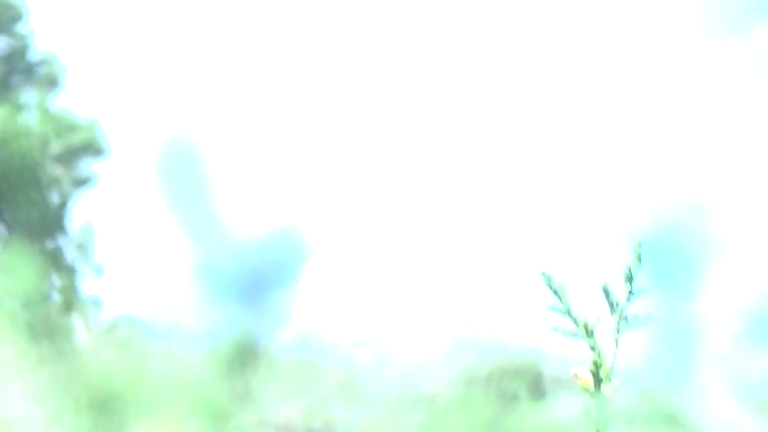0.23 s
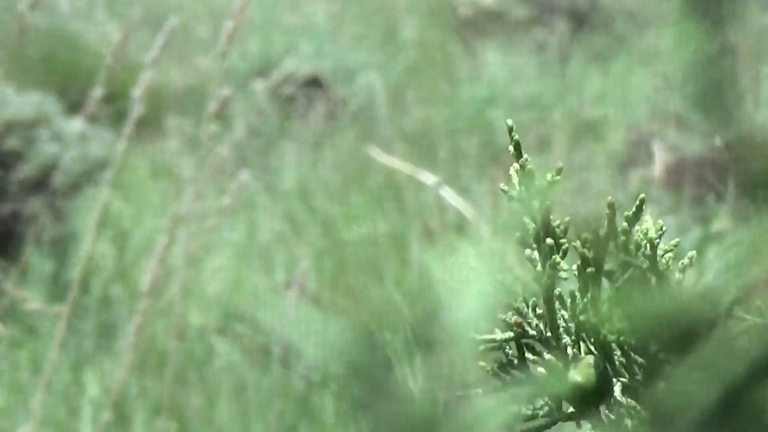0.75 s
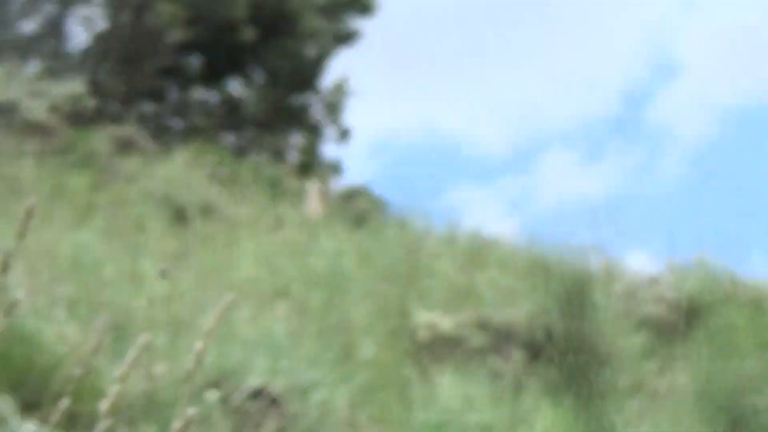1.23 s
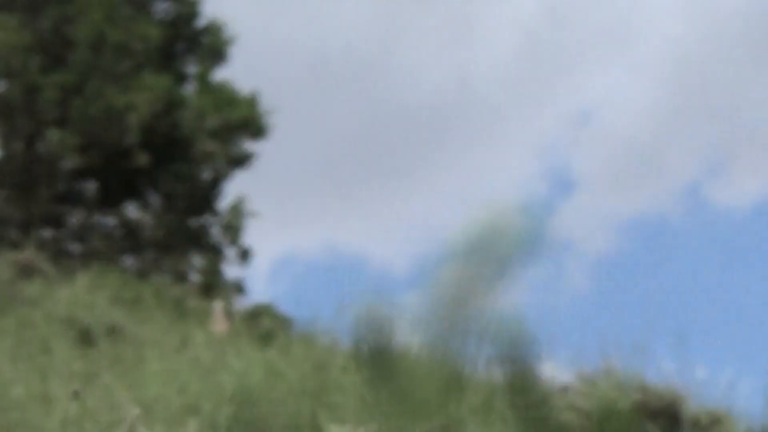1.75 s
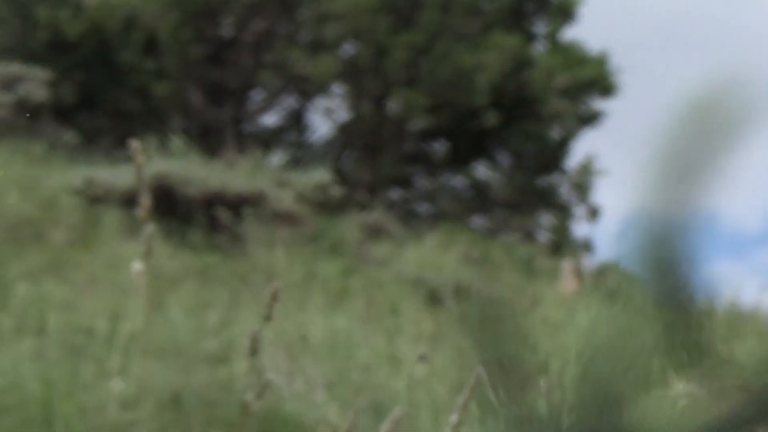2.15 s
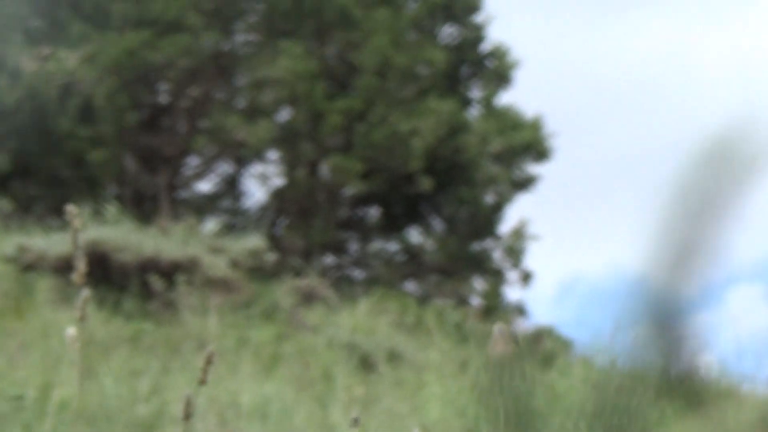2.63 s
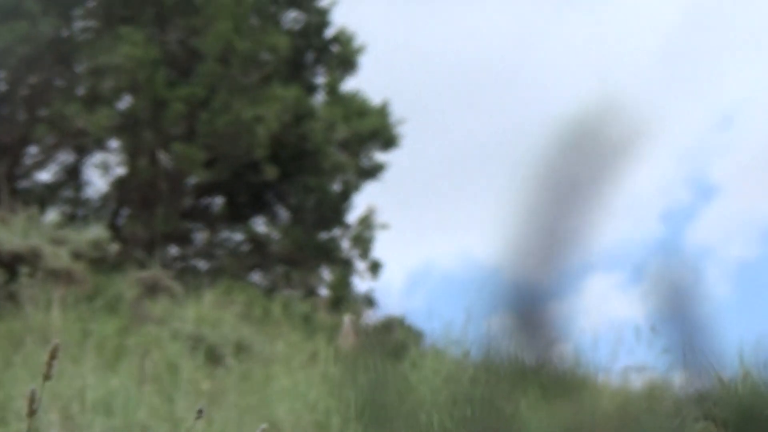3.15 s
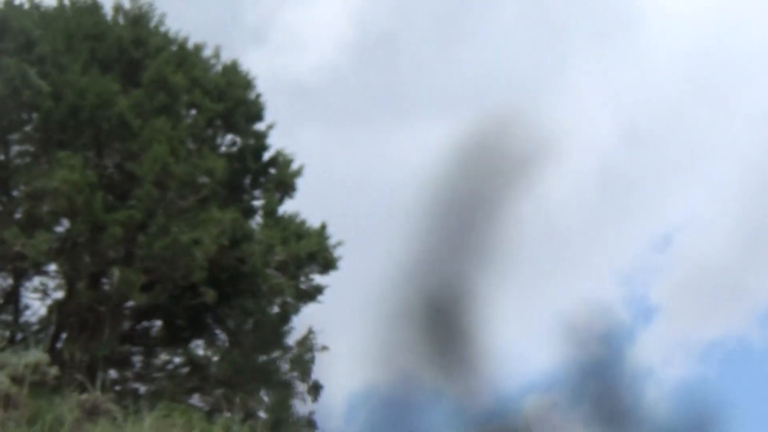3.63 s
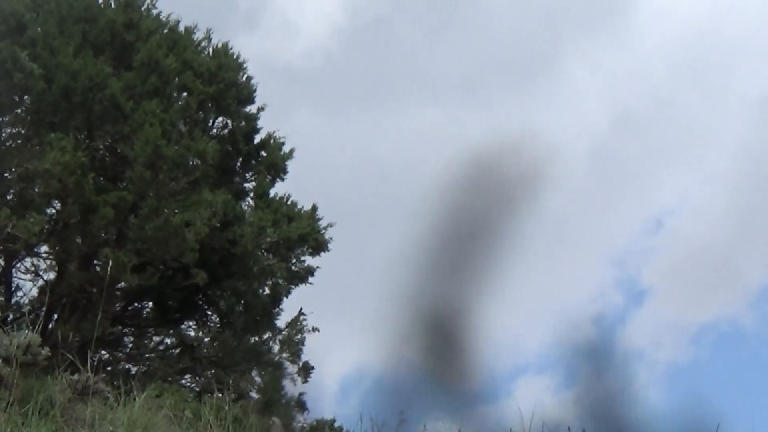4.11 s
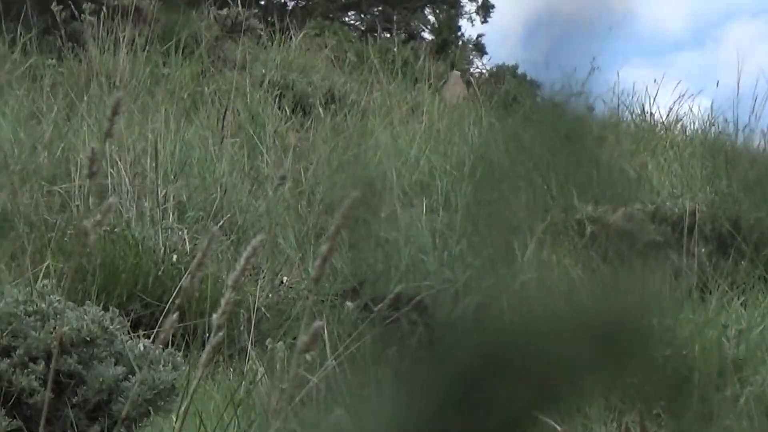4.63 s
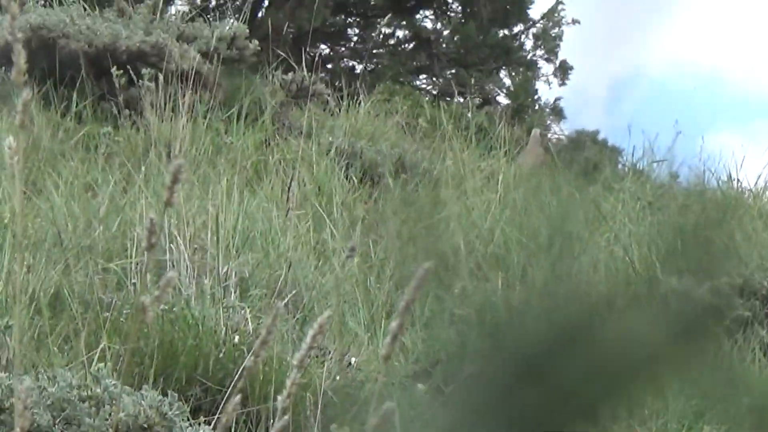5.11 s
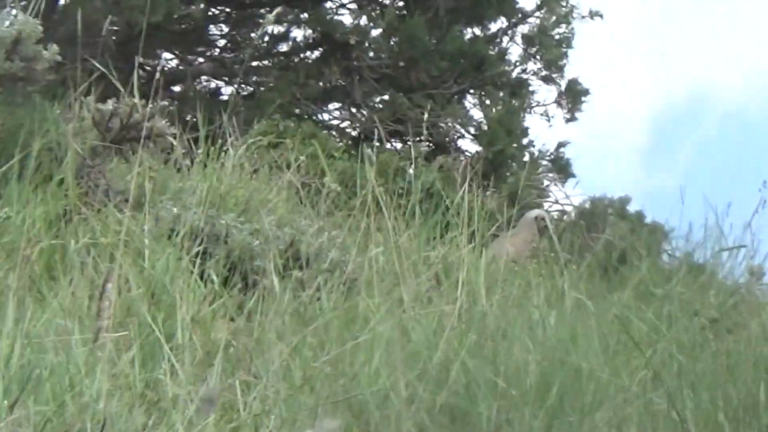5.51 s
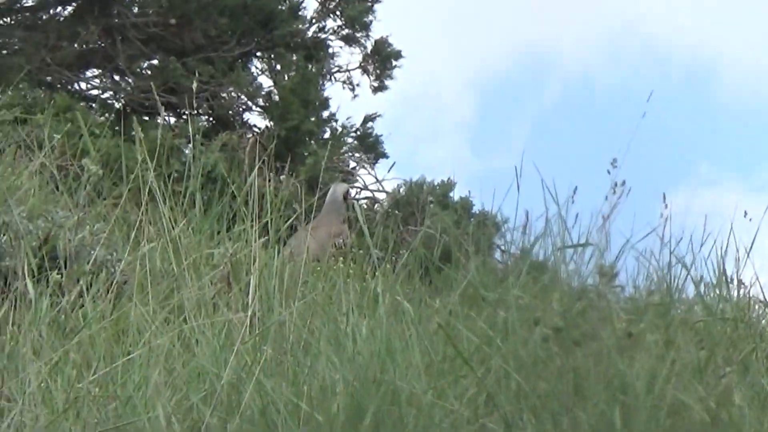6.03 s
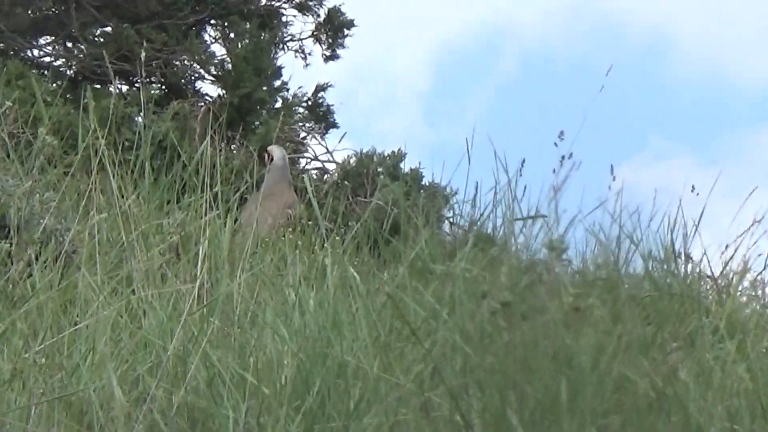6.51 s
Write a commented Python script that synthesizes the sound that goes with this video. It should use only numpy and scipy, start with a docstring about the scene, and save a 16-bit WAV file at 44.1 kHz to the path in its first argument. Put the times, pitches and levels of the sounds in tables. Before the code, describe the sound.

Outdoors on an open grassy slope, with branches touching the microphone. From 0 to 2 s, loud dry foliage scrapes and crackles very close, bright and needly at first, swelling around 0.35 s, then patchier, with sharp twig snaps throughout. Dull body bumps come near 0.5, 0.8, 1.2 and 1.4 s, the heaviest around 1.35 s, and a last cluster near 1.9 s. After 2.3 s only soft grass stirring and tiny ticks remain over a faint breeze. A partridge upslope gives hoarse, strained squeals in short bursts from 2.5 to 4.1 s. From 4.3 s it changes to low, throaty, rough clucks, at first spaced, then quicker and often paired, the strongest near 6.75 s. From about 4.6 s a distant songbird twitters thinly with high hooks, slurs, trills and whistles. A few closer snaps return at 5.4 to 5.7 s.

```python
"""Branches at the camera, partridge upslope

A grassy hillside. Juniper twigs and grass brush and snap against a camera being moved into place, right at
the microphone: friction is crackling noise, snaps and bumps are short bursts ringing through wood and body.
Upslope a partridge squeals, then clucks at length: rough harmonic notes shaped by a throat.
Farther off a small songbird twitters in thin gliding tones, over a faint breeze of coloured noise."""
import sys
import numpy as np
from scipy import signal
from scipy.fft import rfft, irfft, next_fast_len
from scipy.io import wavfile
from scipy.ndimage import uniform_filter1d, map_coordinates

SR = 44100
rng = np.random.default_rng(int(sys.argv[2]) if len(sys.argv) > 2 else 0)


def wrap_up_sound(samples):
    """Save the sound to the file named by the first command line argument, as 16-bit audio."""
    columns = np.atleast_2d(samples).T
    # keep every value between -1 and 1, then stretch to whole-number steps
    tamed = np.clip(columns, -1, 1)
    steps = np.round(tamed * 32767).astype(np.int16)
    wavfile.write(sys.argv[1], SR, steps)


N = 298557

# Foliage pressing on the camera body. Each row: time in seconds, scraping level in dB.
BRUSH_LEVEL = [(0, -38.5), (0.26, -33), (0.305, -30.5), (0.35, -25.5), (0.42, -29.5), (0.51, -30.5),
               (0.56, -40.5), (0.66, -40), (0.9, -40), (0.95, -53), (1.14, -39), (1.24, -36), (1.31, -49.5),
               (1.42, -37.5), (1.72, -44.5), (1.79, -48), (1.89, -41), (2.0, -57), (2.1, -46.5),
               (2.35, -53)]
# Contact passing from needle tips to the branch itself. Each row: time in seconds, then needle crackle,
# rubbing and handling rumble, each in dB over the scraping.
CONTACT_BALANCE = [(0, 8.5, -11, -19), (0.25, 4, -19, -16), (0.34, -9, -28.5, -18.5),
                   (0.45, -0.5, -21, -22), (0.66, -4, -3, -6.5), (0.88, -3, -3, -12), (1.24, -4.5, -7, -20),
                   (1.42, -6, -15, -16), (1.65, -4, -13.5, -23), (2.3, -10, -6.5, -16)]
# Grass stirring afterwards. Each row: time in seconds, level in dB.
STIR_LEVEL = [(2.3, -50), (2.42, -61), (2.51, -51), (2.83, -59), (2.92, -51), (3.3, -55.5), (3.59, -52.5),
              (3.75, -58), (4.5, -60), (5.37, -61.5), (5.74, -55), (5.88, -60.5), (6.23, -65),
              (6.66, -58.5), (6.77, -69)]
# Handling rumble spectrum. Each row: frequency in Hz, level in dB.
RUMBLE_SPECTRUM = [(12, -42), (20, -23), (54, 0.5), (145, -6.5), (170, -8.5), (220, -19), (370, -120)]
# Dull rubbing spectrum. Each row: frequency in Hz, level in dB.
RUB_SPECTRUM = [(76, -42), (130, -9.5), (210, -4.5), (301, -2.5), (387, -4.5), (492, -2.5), (700, -13.5),
                (910, -26.5), (1540, -120)]
# Scraping spectrum. Each row: frequency in Hz, level in dB.
SCRAPE_SPECTRUM = [(320, -51), (550, -28), (645, -6), (812, -1), (953, -3), (1210, -2.5), (1340, 1.5),
                   (1590, -4.5), (1960, -1.5), (2230, -6), (3830, -3.5), (6000, -16), (7800, -31.5),
                   (13200, -120)]
# Needle tip spectrum. Each row: frequency in Hz, level in dB.
NEEDLE_SPECTRUM = [(2940, -24.5), (5000, -6), (5760, -5.5), (8090, 1), (8540, -2.5), (9370, 0.5),
                   (12600, -11.5), (14200, -16), (16000, -23)]
# Grass stem spectrum. Each row: frequency in Hz, level in dB.
STEM_SPECTRUM = [(76, -31), (130, -5.5), (285, -2.5), (537, -6), (787, -2), (1030, -2.5), (1140, -1.5),
                 (2570, -8.5), (3590, -8), (5270, -14), (7000, -20.5), (9100, -55), (15400, -120)]
# Blade tip spectrum. Each row: frequency in Hz, level in dB.
BLADE_TIP_SPECTRUM = [(2940, -29), (5000, -13), (6570, -19), (7600, 5), (9550, 3), (14400, -6.5),
                      (16000, -27.5)]
# Stereo width of the sounds at the microphone. Each row: frequency in Hz, side to mid in dB.
NEAR_SIDE = [(60, -16), (110, -13.5), (200, -7.5), (380, -3), (700, -3), (1290, -5.5), (2380, -2),
             (4400, -6), (8120, -10), (15000, -29.5)]
# Breeze spectrum. Each row: frequency in Hz, level in dB.
BREEZE_SPECTRUM = [(12, -41), (20, 2.5), (54, 3), (98, 1), (315, -5), (452, 3), (597, -6), (686, 0.5),
                   (788, 0), (1010, -5), (1980, -20.5), (3540, -17.5), (4430, -15), (5850, -14),
                   (15500, -21.5)]
# Stereo width of the breeze. Each row: frequency in Hz, side to mid in dB.
FAR_SIDE = [(60, -17), (110, -10.5), (200, -8), (380, -5), (700, -7.5), (1290, -2.5), (2380, -2),
            (4400, -4), (8120, -14.5), (15000, -25)]
# Twigs snapping. Each row: start in seconds, energy of the crack in dB, brightness in dB
# (a thin twig has that much more tip and that much less wood).
SNAPS = [(0.0233, -9, 7.5), (0.104, -26, 6.5), (0.1672, -12, 9), (0.1734, -10, 8), (0.2756, -10.5, 6.5),
         (0.3124, -7.5, 3), (0.4514, -4, -8.5), (0.5083, -10, 3), (0.6468, -8.5, 0), (0.6725, -16, -11),
         (0.781, -16, 11), (0.8187, -15, 4), (0.8381, -7, 0), (1.1085, -14, -1.5), (1.1608, -6.5, 3),
         (1.188, -6.5, 0.5), (1.3545, -3, -6), (1.3881, -3.5, -3), (1.3988, -13, -7), (1.4121, -1.5, 1.5),
         (1.457, -16.5, 5.5), (1.5719, -7.5, -1), (1.647, -11.5, 5.5), (1.6655, -13, 7.5),
         (1.696, -18.5, -6.5), (1.856, -24, 11), (1.8623, -12.5, 8.5), (1.8859, -7.5, 1),
         (1.8988, -15, -11), (2.049, -26.5, -4.5), (2.71, -28, -4.5), (2.758, -22, -1),
         (2.831, -26.5, -2.5), (2.97, -19.5, -9), (2.996, -23.5, 3), (3.0373, -18.5, -1), (3.083, -24, 2),
         (3.344, -23.5, -4), (3.452, -26, -0.5), (3.631, -28.5, 5.5), (4.1173, -30.5, 4.5),
         (5.418, -12.5, -1), (5.53, -22.5, -0.5), (5.6077, -13.5, -8), (5.7081, -19, 7.5)]
# Branches bumping the camera body. Each row: start in seconds, energy in dB.
BUMPS = [(0.5075, -7), (0.7813, -11.5), (0.8381, -10), (1.187, -2.5), (1.3545, -1), (1.428, -7.5),
         (1.8866, -13), (1.8995, -11.5), (5.53, -22.5)]
# Dull knock of a bump or snap. Each row: frequency in Hz, level in dB.
KNOCK_SPECTRUM = [(40, -23.5), (100, -5), (150, -13), (210, 0), (320, -2.5), (500, -4), (900, -28),
                  (2000, -51)]
# Ring of the wood in a snap. Each row: frequency in Hz, level in dB.
WOOD_SPECTRUM = [(250, -17.5), (550, -2.5), (850, 9.5), (1400, 10.5), (2500, 5.5), (3300, 0), (6000, -24.5)]
# Sharp crack of a snap. Each row: frequency in Hz, level in dB.
CRACK_SPECTRUM = [(1200, -42.5), (2400, 2.5), (3100, -3.5), (4500, 1.5), (6000, -3), (7200, -7),
                  (11000, -61)]
# Twig tip in a snap. Each row: frequency in Hz, level in dB.
TWIG_TIP_SPECTRUM = [(3000, -30.5), (5600, -10.5), (7000, -1.5), (9000, 0.5), (11000, -6), (16000, -22.5)]
# Single strokes of a twig. Each row: start in seconds, length in seconds, level in dB, centre in Hz,
# width in octaves.
STROKES = [(0.21, 0.052, -46, 226, 0.12), (0.2333, 0.019, -22, 9370, 0.11),
           (0.249, 0.017, -26.5, 9170, 0.5), (0.293, 0.0064, -33, 454, 0.091),
           (0.328, 0.061, -29.5, 1086, 0.67), (0.439, 0.048, -31.5, 1890, 0.49),
           (0.488, 0.034, -33, 4000, 0.89), (0.726, 0.014, -34.5, 320, 0.24), (0.792, 0.057, -36, 328, 1.8),
           (1.24, 0.029, -41, 1150, 0.61), (1.352, .028, -35.5, 203, 0.3), (1.427, 0.023, -33, 264, 3),
           (1.55, 0.032, -35.5, 1540, 0.78), (1.859, 0.05, -37, 4000, 8), (1.867, 0.05, -41, 184, 0.22),
           (2.28, 0.031, -47.5, 2680, 0.88), (2.463, 0.019, -51, 810, 0.18),
           (2.891, 0.054, -50.5, 2800, 0.58), (2.961, 0.032, -43.5, 1450, 1.55),
           (2.968, .012, -41.5, 776, 0.19), (3.354, 0.02, -47, 764, 0.74), (3.863, 0.097, -54, 1290, 0.67),
           (4.482, 0.044, -58, 2500, 1.3), (5.602, 0.016, -36, 1510, 0.72),
           (5.734, 0.031, -50.5, 816, 0.74)]
# Hoarse squeals, in five bursts. Each row: start in seconds, length in seconds, pitch in Hz,
# glide as a share of the pitch, level in dB, roughness 0-1, bill resonance in Hz.
SQUEALS = [(2.514, 0.032, 590, -.035, -48.5, 0.42, 1170), (2.573, 0.015, 628, 0, -57, 0.5, 2500),
           (2.606, 0.028, 636, -.01, -49.5, 0.63, 3100), (3.104, 0.077, 586, 0.023, -53.5, 0.45, 1170),
           (3.133, 0.022, 574, .09, -46.5, 0.63, 3380), (3.145, 0.062, 610, .05, -47.5, 0.25, 1910),
           (3.193, 0.042, 892, -0.067, -50.5, 0.42, 2600), (3.237, 0.055, 594, -.05, -52, 1, 1810),
           (3.469, 0.061, 901, -.04, -49, 0.5, 3260), (3.521, 0.041, 894, 0.083, -45.5, 0.28, 2850),
           (3.573, 0.047, 611, -.06, -50.5, 0.72, 1900), (3.727, 0.033, 604, -0.033, -43, 0.51, 2330),
           (3.747, 0.026, 591, -.04, -46.5, 0.67, 3440), (3.944, 0.027, 581, -.08, -46.5, 0.94, 2400),
           (3.977, 0.041, 850, 0.0034, -42, 0.56, 2660), (4.03, 0.015, 1250, .1, -51, 0.2, 2530),
           (4.056, 0.043, 603, -.02, -48.5, 0.96, 3130)]
# Throat behind the squeals. Each row: frequency in Hz, level in dB.
SQUEAL_THROAT = [(400, -30), (900, -20), (1250, -3), (1800, -1), (2200, -1.5), (3100, -2.5), (3650, 0),
                 (4500, -5), (5400, -7.5), (6800, -22.5), (10000, -36.5)]
# Clucks. Each row: start in seconds, length in seconds, pitch in Hz, glide as a share of the pitch,
# level in dB, lower throat resonance in Hz.
CLUCKS = [(4.288, 0.039, 387.5, 0.13, -55, 1170), (4.431, 0.062, 340, -.05, -56, 880),
          (4.659, 0.05, 361, -0.23, -53.5, 1020), (4.774, 0.066, 338, -0.23, -56.5, 940),
          (5, 0.074, 355.5, 0.097, -49, 1060), (5.058, 0.065, 357, -.08, -57.5, 730),
          (5.116, 0.0506, 339, -0.17, -53.5, 990), (5.327, 0.051, 330, 0.041, -52, 1000),
          (5.6, 0.045, 361, -.18, -52, 1040), (5.794, 0.056, 344, -0.17, -52.5, 1000),
          (5.912, 0.045, 437, -0.035, -56, 1210), (6.038, 0.074, 382, 0.024, -61, 770),
          (6.078, 0.052, 363, -0.19, -52, 990), (6.124, 0.033, 426, 0.018, -59, 1260),
          (6.276, 0.054, 338, -0.11, -51.5, 1010), (6.391, 0.043, 418, 0.015, -63, 1250),
          (6.493, 0.051, 414.4, 0.0087, -55, 1240), (6.537, 0.067, 352, -0.15, -50.5, 975),
          (6.701, 0.067, 426, -0.016, -57, 1250), (6.742, 0.075, 355, -0.1, -44.5, 1040)]
# Throat behind the clucks. Each row: frequency in Hz, level in dB.
CLUCK_THROAT = [(200, -25), (420, -19), (720, -16), (1000, -14), (1300, -13), (1650, -24), (2400, -26),
                (3200, -26), (5000, -35), (7000, -48)]
# Songbird's hooked notes, a fall and then a rise. Each row: start in seconds, level of the rise in dB.
HOOKS = [(4.62, -60.5), (4.762, -57.5), (4.872, -58.5), (4.966, -62)]
# Songbird's quick slurs. Each row: start in seconds, length in seconds, start in Hz, end in Hz, level in dB.
SLURS = [(6.105, 0.0075, 8040, 5300, -51), (6.21, 0.0091, 5400, 7400, -52), (6.638, 0.021, 6400, 4960, -55),
         (6.683, 0.025, 6400, 4800, -57)]
# Songbird's trills of falling notes. Each row: start in seconds, length in seconds, notes per second,
# top in Hz, bottom in Hz, level in dB just past the middle.
TRILLS = [(5.257, 0.099, 75, 5850, 5250, -66), (6.297, 0.11, 57, 7300, 6400, -55),
          (6.295, 0.11, 53, 6000, 5350, -66)]
# Songbird's held whistles. Each row: start in seconds, length in seconds, pitch in Hz, level in dB.
WHISTLES = [(5.228, 0.026, 5150, -62), (5.54, 0.075, 7450, -70), (5.81, 0.023, 6850, -65.5),
            (5.935, 0.045, 5760, -64.5), (6.437, 0.053, 7600, -64.5), (6.512, 0.11, 7500, -64),
            (6.443, 0.13, 5580, -67)]

BLADE_TIPS_DB = -12  # blade tips against stems
BREEZE_DB = -62.5
TOP_HZ = 16000  # band limit of the camera
SNAP_KNOCK_DB = -26.5  # the dull part of a snap, against its wood
BUMP_T60_S = 0.038  # fast decay of the push behind a bump
# small random snaps: energy over the rustle's level, its scatter either way, mean brightness
TICKS_PER_S, TICK_DB, TICK_SCATTER_DB, TICK_BRIGHT_DB = 9, 13, 5.5, 4.5

# mid-note rise and unsteadiness at full roughness, as shares of the pitch; exponent of the envelope
SQUEAL_ARCH, SQUEAL_JITTER, SQUEAL_FULLNESS = 0.035, 0.06, 0.69
CLUCK_ARCH, CLUCK_JITTER, CLUCK_FULLNESS = 0.11, 0.081, 1.05
BILL_DB, BILL_WIDTH_HZ = 2, 190
LOWER_DB, LOWER_WIDTH_HZ, UPPER_DB, UPPER_WIDTH_HZ = 2, 217, -9.5, 370  # the two throat resonances
EASY_HZ, EASY_ROUGH, ROUGH_PER_HZ = 349, 0.516, 0.0029  # a cluck grows rougher with pitch
UPPER_HZ, UPPER_EXTRA_HZ, SETTLE_S = 3490, 1300, 0.77  # the upper resonance sinks as the run settles

HOOK_FALL_HZ, HOOK_RISE_HZ = (7660, 6000), (4980, 6480)  # (start, end)
HOOK_HALF_S, HOOK_FALL_DB = 0.0112, -5.5  # length of each half; the fall is weaker
SWEEP_WAVER, WHISTLE_WAVER, WAVER_PER_S = 0.011, 0.022, 400  # pitch flutter as a share; its knots a second
TWITTER_S, TWITTER_HZ = (4.95, 8.3), (5200, 7900)  # ranges of start time and start pitch
TWITTER_NOTE_S, TWITTER_GLIDE, TWITTER_DB = 0.033, 0.1, -66  # glide: largest share, up or down


def amp(db):
    """Decibels to gain."""
    return 10 ** (np.asarray(db) / 20)


def unit(x):
    """Scaled to rms 1."""
    return x / np.sqrt(np.mean(x ** 2) + 1e-20)


def along(points, hz):
    """(Hz, value) points read on a log axis."""
    f, v = np.transpose(points)
    return np.interp(np.log(hz + 1), np.log(f + 1), v)


def curves(rows):
    """One value per sample for each column after the time."""
    s, *cols = np.transpose(rows)
    return [np.interp(np.arange(N) / SR, s, c) for c in cols]


def wobble(rate, n):
    """A smooth random curve of n samples, rate knots a second."""
    knots = rng.standard_normal(int(n * rate / SR) + 4)
    return map_coordinates(knots, [np.arange(n) * rate / SR], mode="nearest")


def filtered(x, response):
    """x times a response of frequency."""
    n = x.shape[-1]
    m = next_fast_len(n + 2048)
    return irfft(rfft(x, m) * response(np.fft.rfftfreq(m, 1 / SR)), m)[..., :n]


def coloured(x, points):
    """x through a (Hz, dB) spectrum, at rms 1."""
    return unit(filtered(x, lambda hz: amp(along(points, hz))))


def stereo(pair, side):
    """Two unrelated signals as the middle and the sides of a stereo image."""
    wide = filtered(pair[1], lambda hz: amp(along(side, hz)))
    return np.array([pair[0] + wide, pair[0] - wide])


def add(track, s, sound):
    """Mix a sound into a track at s seconds."""
    part = track[..., max(round(s * SR), 0):][..., :sound.shape[-1]]
    part += sound[..., :part.shape[-1]]


def swell(length, fullness):
    """Progress 0-1 through a note, and its rounded envelope."""
    u = np.linspace(0, 1, max(int(length * SR), 64))
    return u, np.abs(np.sin(np.pi * u)) ** fullness


def crackle(n, rate, spread_db, hiss):
    """Tiny slips of very unequal size over smooth friction noise, in two channels."""
    slips = (rng.random(n) < rate / SR) * amp(spread_db * np.minimum(rng.exponential(size=n), 4))
    decays = signal.lfilter([1], [1, -np.exp(-1 / (0.00022 * SR))], slips)
    grains = decays * rng.standard_normal((2, n))
    return unit(unit(grains) + hiss * rng.standard_normal((2, n)))


def patchy(x, depth_db):
    """Patches of random gain over time and frequency, so the texture shifts from moment to moment."""
    z = signal.stft(x, nperseg=512)[2]
    across_pitch = uniform_filter1d(rng.standard_normal(z.shape[1:]), size=7, axis=0)
    field = uniform_filter1d(across_pitch, size=5, axis=1)
    return signal.istft(z * amp(depth_db * unit(field)), nperseg=512)[1][:, :N]


def foliage():
    """Branches drag over the camera, one pressure scaling every friction layer; then grass stirs instead."""
    scrape_db, = curves(BRUSH_LEVEL)
    needle_db, rub_db, rumble_db = curves(CONTACT_BALANCE)
    stir_db, = curves(STIR_LEVEL)
    touching = np.interp(np.arange(N) / SR, [2.3, 2.4], [1, 0])

    slips = patchy(crackle(N, rate=800, spread_db=3.5, hiss=0.99), depth_db=3.0)
    slips = slips * amp(1.88 * wobble(59.52, N))
    friction = coloured(slips, SCRAPE_SPECTRUM)
    friction += amp(rub_db) * coloured(slips, RUB_SPECTRUM)
    friction += amp(needle_db) * coloured(slips, NEEDLE_SPECTRUM)
    rumble = amp(rumble_db) * coloured(rng.standard_normal((2, N)), RUMBLE_SPECTRUM)
    branches = amp(scrape_db) * (friction + rumble)

    ticks = patchy(crackle(N, rate=500, spread_db=5.0, hiss=1.51), depth_db=4.0)
    blade_tips = amp(BLADE_TIPS_DB) * coloured(ticks, BLADE_TIP_SPECTRUM)
    grass = amp(stir_db) * (coloured(ticks, STEM_SPECTRUM) + blade_tips)
    return stereo(touching * branches + (1 - touching) * grass, NEAR_SIDE)


def breeze():
    """Faint moving air over the slope: patchy coloured noise with a slow drift in level."""
    air = coloured(patchy(rng.standard_normal((2, N)), depth_db=2.0), BREEZE_SPECTRUM)
    return amp(BREEZE_DB + 0.257 * wobble(2.73, N)) * stereo(air, FAR_SIDE)


def struck(x, points, size=4096):
    """x through a causal body with the given spectrum, at energy 1."""
    cepstrum = irfft(np.log(amp(along(points, np.fft.rfftfreq(size, 1 / SR)))))
    cepstrum[1:size // 2] *= 2  # folding the cepstrum forward gives minimum phase
    cepstrum[size // 2 + 1:] = 0
    y = irfft(rfft(x, size) * np.exp(rfft(cepstrum)))
    return y / np.linalg.norm(y, axis=-1, keepdims=True)


def burst(t60, size=2048):
    """The push of one contact: noise that dies fast over a weak, longer rattle."""
    t = np.arange(size) / SR
    return rng.standard_normal((2, size)) * (amp(-60 * t / t60) + amp(-20.0 - 60 * t / 0.074))


def snap(bright_db):
    """A sharp crack, a short ring of wood and a dull knock; the higher parts die away sooner."""
    wood = struck(burst(0.025), WOOD_SPECTRUM)
    wood += amp(SNAP_KNOCK_DB) * struck(burst(0.025), KNOCK_SPECTRUM)
    crack = struck(burst(0.017), CRACK_SPECTRUM)
    tip = struck(burst(0.0099), TWIG_TIP_SPECTRUM)
    return amp(-bright_db) * wood + crack + amp(bright_db) * tip


def snaps():
    """Twigs snap and branches bump the camera; small snaps fall at random, their level following the rustle."""
    out = np.zeros((2, N))
    for s, db, bright_db in SNAPS:
        add(out, s, amp(db) * snap(bright_db))
    for s, db in BUMPS:
        add(out, s, amp(db) * struck(burst(BUMP_T60_S), KNOCK_SPECTRUM))
    times, rustle_db = np.transpose(BRUSH_LEVEL[:-1] + STIR_LEVEL)
    for place, force, thinness in rng.random((int(TICKS_PER_S * N / SR), 3)):
        s = place * N / SR
        db = np.interp(s, times, rustle_db) + TICK_DB + TICK_SCATTER_DB * (2 * force - 1)
        add(out, s, amp(db) * snap(2 * TICK_BRIGHT_DB * thinness))
    return stereo(out, NEAR_SIDE)


def strokes():
    """A twig slides for a moment: crackling friction, banded around its own pitch."""
    out = np.zeros((2, N))
    for s, length, db, centre_hz, octaves in STROKES:
        u, envelope = swell(length, fullness=0.34)
        slips = crackle(len(u), rate=1100, spread_db=1.5, hiss=1.0) * envelope

        def band(hz):
            """A bell on the octave scale, with the extreme treble rolled off."""
            bell = np.exp(-.5 * (np.log2((hz + 1) / centre_hz) / octaves) ** 2)
            return bell / (1 + (hz / 11000) ** 4)
        add(out, s, amp(db) * unit(filtered(slips, band)))
    return stereo(out, NEAR_SIDE)


def syrinx(length, start_hz, end_hz, rough, arch, jitter, fullness, uneven_db, count=20):
    """One note: harmonics on an arched pitch, which jitter and break into puffs of air as the voice roughens."""
    u, envelope = swell(length, fullness)
    rough = np.clip(rough, 0, 1)
    pitch = (start_hz + (end_hz - start_hz) * u) * (1 + arch * (np.sin(np.pi * u) - np.pi / 4))
    phase = 2 * np.pi * np.cumsum(pitch * (1 + jitter * rough * wobble(218.4, len(u)))) / SR
    k = np.arange(1, count + 1)[:, None]
    # the membranes favour changing partials
    emphasis = amp(uneven_db * np.array([wobble(21.3, len(u)) for _ in k]))
    lag = rng.uniform(0, 2 * np.pi, k.shape)  # throat and distance smear each pulse
    partials = emphasis * np.cos(k * phase + lag) * (k * pitch < SR / 2)
    pulses = unit(partials.sum(0))
    pulses *= amp(5.7 * rough * wobble(412, len(u)))  # unequal pulses make the rasp
    air = unit(rng.standard_normal(len(u)) * (0.84 + np.cos(phase)))
    voice = np.sqrt(1 - rough ** 2) * unit(pulses) + rough * air
    return np.pad(envelope * voice, (0, 128))


def bump(hz, centre_hz, width_hz):
    """A steep-sided resonance of height 1."""
    return 1 / (1 + ((hz - centre_hz) / width_hz) ** 2) ** 2


def squeals():
    """High strained partridge notes; the open bill adds a resonance to the throat, placed anew for each."""
    out = np.zeros(N)
    for s, length, pitch_hz, glide, db, rough, bill_hz in SQUEALS:
        start_hz, end_hz = pitch_hz * (1 - glide / 2), pitch_hz * (1 + glide / 2)
        note = syrinx(length, start_hz, end_hz, rough, SQUEAL_ARCH, SQUEAL_JITTER, SQUEAL_FULLNESS, uneven_db=4)
        throat = lambda hz: amp(along(SQUEAL_THROAT, hz)) + amp(BILL_DB) * bump(hz, bill_hz, BILL_WIDTH_HZ)
        add(out, s, amp(db) * unit(filtered(note, throat)))
    return out


def clucks():
    """Low arched partridge notes through two throat resonances; higher ones are rougher."""
    out = np.zeros(N)
    for s, length, pitch_hz, glide, db, lower_hz in CLUCKS:
        start_hz, end_hz = pitch_hz * (1 - glide / 2), pitch_hz * (1 + glide / 2)
        rough = EASY_ROUGH + ROUGH_PER_HZ * (pitch_hz - EASY_HZ)
        upper_hz = UPPER_HZ + UPPER_EXTRA_HZ * np.exp((CLUCKS[0][0] - s) / SETTLE_S)
        note = syrinx(length, start_hz, end_hz, rough, CLUCK_ARCH, CLUCK_JITTER, CLUCK_FULLNESS, uneven_db=2)
        throat = lambda hz: (amp(along(CLUCK_THROAT, hz))
                             + amp(LOWER_DB) * bump(hz, lower_hz, LOWER_WIDTH_HZ)
                             + amp(UPPER_DB) * bump(hz, upper_hz, UPPER_WIDTH_HZ))
        add(out, s, amp(db) * unit(filtered(note, throat)))
    return out


def hillside(x, wet_db, t60, pan_db):
    """The direct sound and its short scatter from the slope and the trees, as decaying noise."""
    t = np.arange(SR // 2) / SR
    tail = rng.standard_normal((2, len(t))) * amp(-60 * t / t60) * (1 - np.exp(-t / 0.0016))
    scatter = signal.fftconvolve(x[None], tail / np.linalg.norm(tail[0]), axes=1)[:, :N]
    return x * amp([[pan_db / 2], [-pan_db / 2]]) + amp(wet_db) * scatter


def whistle(length, start_hz, end_hz, waver):
    """One thin gliding tone with a fluttering pitch, at rms 1."""
    u, envelope = swell(length, fullness=0.65)
    pitch = (start_hz + (end_hz - start_hz) * u) * (1 + waver * wobble(WAVER_PER_S, len(u)))
    return unit(envelope * np.sin(2 * np.pi * np.cumsum(pitch) / SR))


def songbird(count=28):
    """Hooks, slurs, trills and buzzy held notes as gliding tones, with a faint random twitter among them."""
    sweeps = list(SLURS)
    for s, db in HOOKS:
        sweeps.append((s, HOOK_HALF_S, *HOOK_FALL_HZ, db + HOOK_FALL_DB))
        sweeps.append((s + HOOK_HALF_S, HOOK_HALF_S, *HOOK_RISE_HZ, db))
    for s, length, rate, top_hz, bottom_hz, db in TRILLS:
        for d in np.arange(0, length, 1 / rate):
            note_db = db - 12 * abs(d / length - .55)
            sweeps.append((s + d, 0.92 / rate, top_hz, bottom_hz, note_db))
    out = np.zeros(N)
    for s, length, start_hz, end_hz, db in sweeps:
        add(out, s, amp(db) * whistle(length, start_hz, end_hz, SWEEP_WAVER))
    for s, length, hz, db in WHISTLES:
        add(out, s, amp(db) * whistle(length, hz, hz, WHISTLE_WAVER))
    for when, height, slope in rng.random((count, 3)):
        s = np.interp(when, [0, 1], TWITTER_S)
        hz = np.interp(height, [0, 1], TWITTER_HZ)
        end_hz = hz * (1 + TWITTER_GLIDE * (2 * slope - 1))
        add(out, s, amp(TWITTER_DB) * whistle(TWITTER_NOTE_S, hz, end_hz, WHISTLE_WAVER))
    return out


def scene():
    """Foliage at the microphone, the partridge upslope, the songbird farther off, and the breeze."""
    twigs = (foliage() + strokes() + snaps()) * amp([[.2], [-.2]])  # a touch to the left
    partridge = hillside(squeals(), wet_db=-13, t60=0.15, pan_db=2.5)
    partridge += hillside(clucks(), wet_db=-14.5, t60=0.19, pan_db=1.5)
    far_bird = hillside(songbird(), wet_db=-5.0, t60=0.26, pan_db=3)
    return twigs + partridge + far_bird + breeze()


def record(dry):
    """The camera keeps nothing above its band limit."""
    return filtered(dry, lambda hz: hz < TOP_HZ)


dry = scene()
out = record(dry)
wrap_up_sound(out)
```